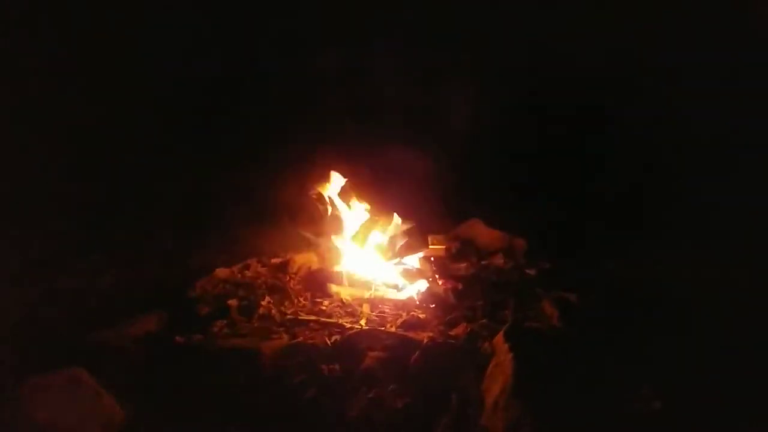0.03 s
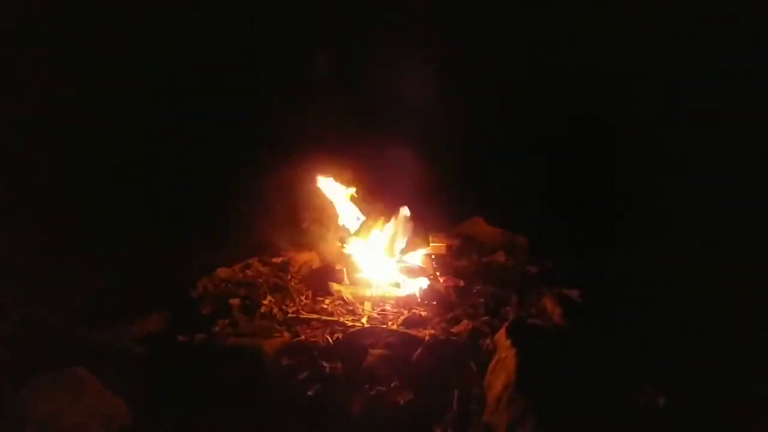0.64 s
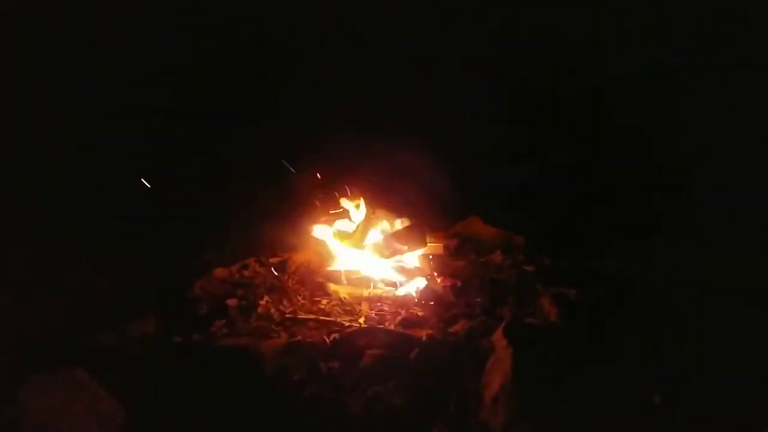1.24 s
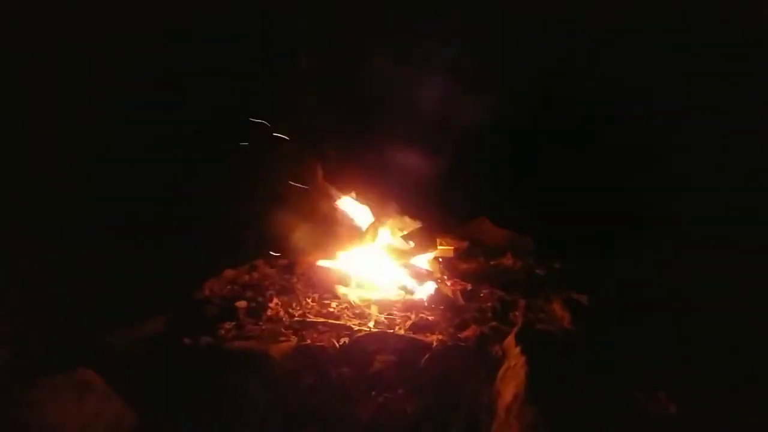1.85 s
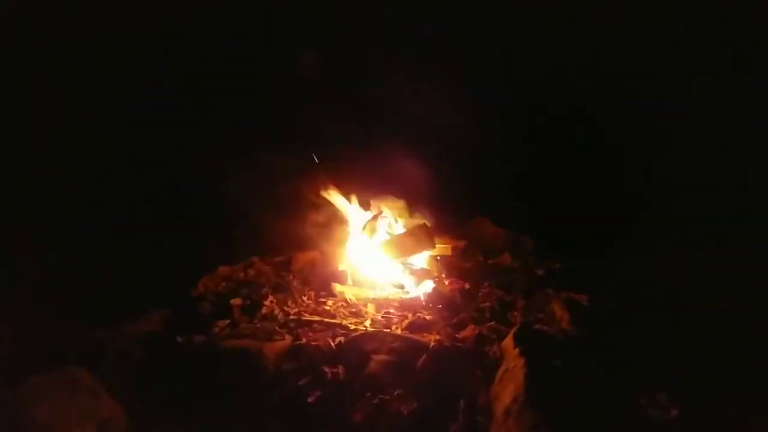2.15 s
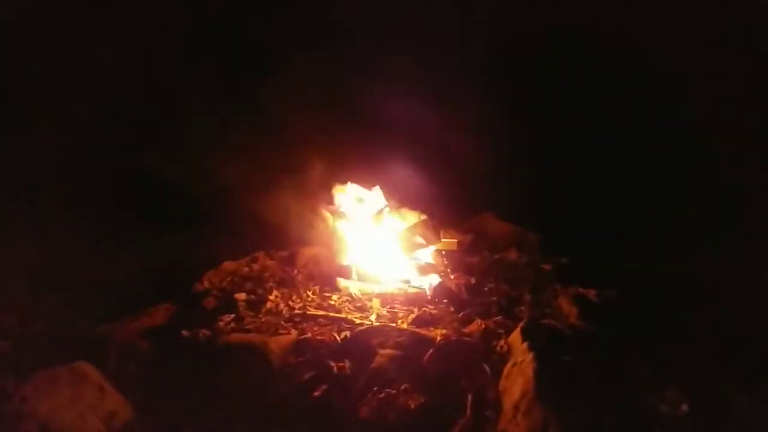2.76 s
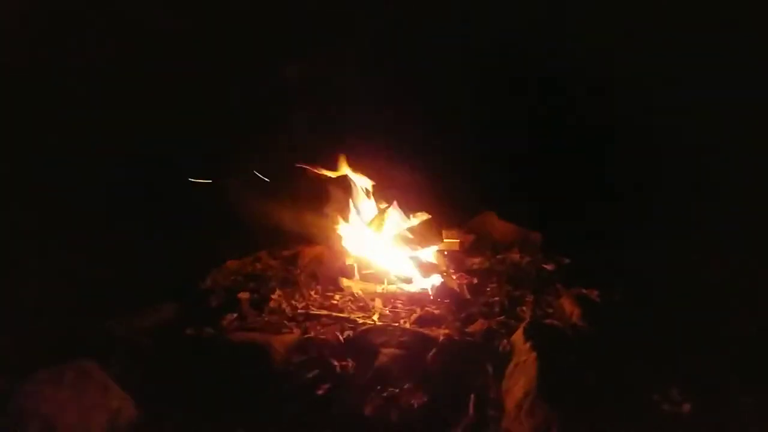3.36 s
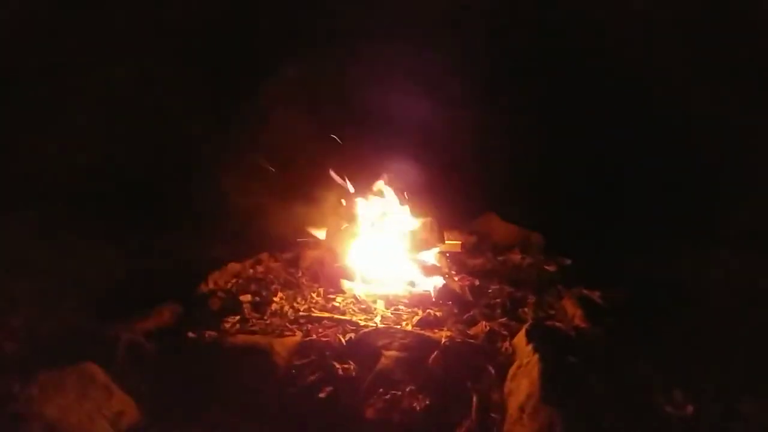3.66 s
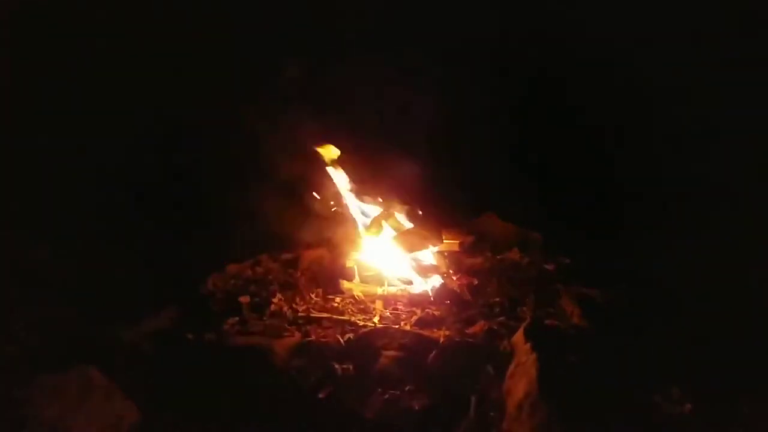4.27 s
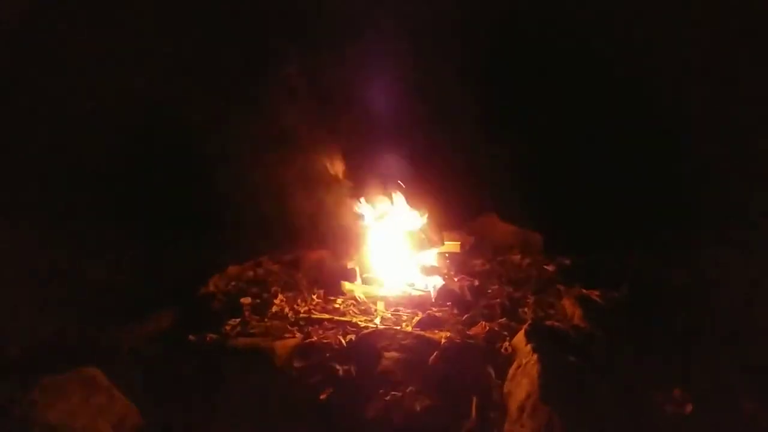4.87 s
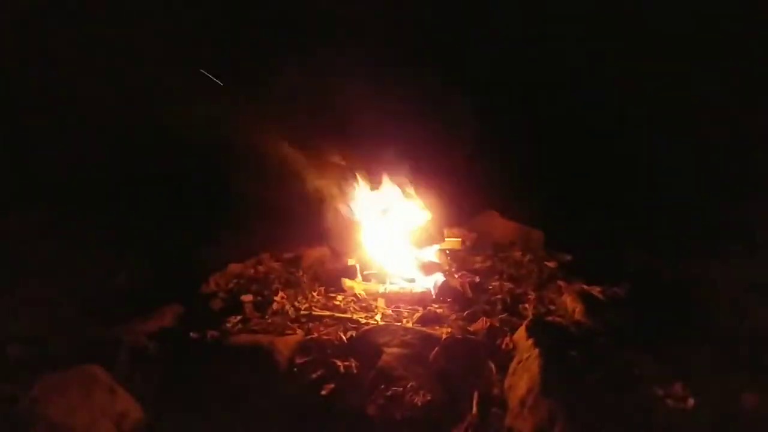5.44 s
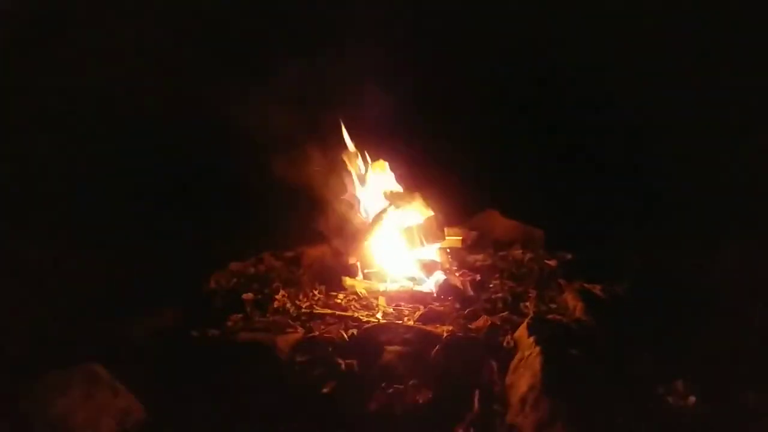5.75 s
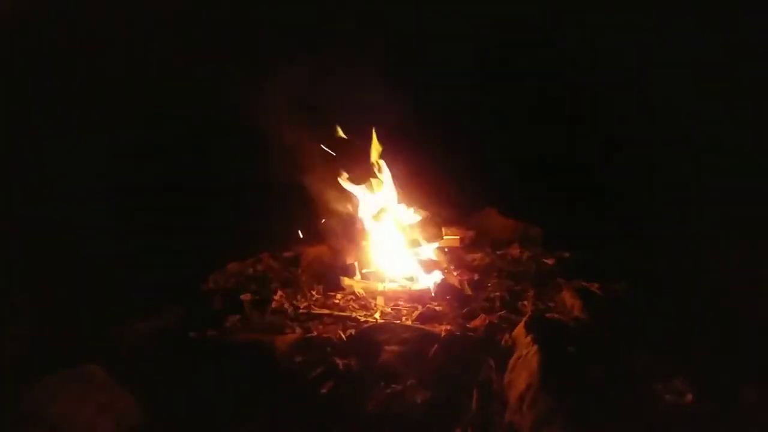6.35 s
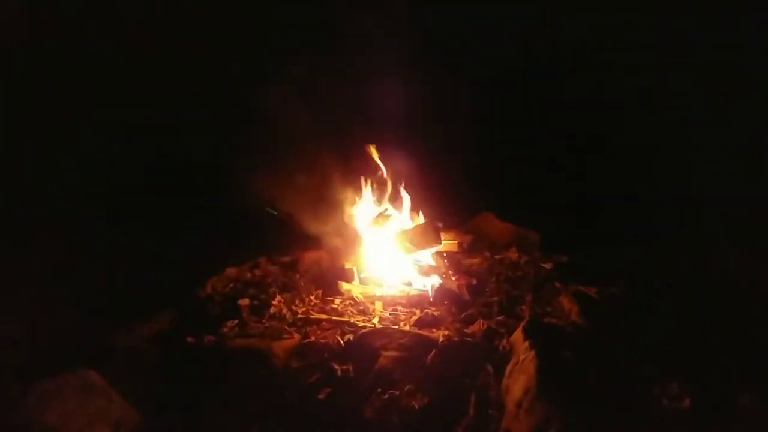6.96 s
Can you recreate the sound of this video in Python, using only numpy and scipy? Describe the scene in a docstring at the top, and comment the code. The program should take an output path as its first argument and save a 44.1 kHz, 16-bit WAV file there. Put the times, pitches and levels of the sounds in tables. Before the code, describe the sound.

A small wood fire burns on the ground outdoors at night, a few metres from a stereo microphone and slightly to the left. Throughout, flames flutter with a soft low rumble over a faint hiss, and embers give tiny, bright ticks. A few light pops with low thumps come around 1 second. Near 1.7 seconds two very loud, sharp cracks burst from the wood a tenth of a second apart, followed by a short, gritty spit of steam. Smaller pops land at about 2.2 and 3.7 seconds. From 4 to 4.7 seconds soft jets of steam escape, with a very faint, wavering whistle that also shows at the start and near the end. A loud, dry pop comes at 5 seconds, and lighter ones at 6.1 and 6.5. The pops echo briefly off the ground and trees, and the fire keeps burning to the end, around 7 seconds.

```python
"""A small wood fire burns on the ground at night, a few metres from a stereo microphone.
From the start, flames flutter with a low rumble over a faint hiss, embers tick and steam sings softly.
Near 1.7 s two steam pockets burst in the wood, very loud, and steam spits out after them.
Smaller pops follow, with soft jets of steam from 4 s and a loud, dry pop near 5 s; the fire burns on.
Every pop scatters off the ground and comes back from the trees."""
import sys
import numpy as np
from scipy import signal
from scipy.fft import rfft, irfft, next_fast_len
from scipy.io import wavfile
from scipy.ndimage import uniform_filter1d

SR = 44100
rng = np.random.default_rng(int(sys.argv[2]) if len(sys.argv) > 2 else 0)


def transcribe(signal):
    """Save signal, clipped to [-1, 1], as a 16-bit WAV file at the path in sys.argv[1]."""
    frames = np.atleast_2d(signal).T
    limited = np.clip(frames, -1, 1)
    pcm = np.round(limited * 32767).astype(np.int16)
    wavfile.write(sys.argv[1], SR, pcm)


N = 313551
T = np.arange(N) / SR
RIGHT_LAG = int(0.00022 * SR)  # samples; the right microphone lies further from the fire


def undb(db):
    """Decibels to gain."""
    return 10 ** (np.asarray(db) / 20)


def unit(x):
    """Scale to a mean energy of one per channel."""
    return x / np.sqrt(np.mean(np.sum(x ** 2, axis=-1)))


def level(x, db):
    """Scale to an rms level."""
    return x * undb(db) / np.sqrt(np.mean(x ** 2))


def pan(db):
    """Constant-power gains for a balance of left minus right."""
    gains = undb([[db / 2], [-db / 2]])
    return gains / np.sqrt(np.mean(gains ** 2))


def curve_db(points, size):
    """An EQ curve read at the bins of a transform."""
    hz, db = np.transpose(points)
    return np.interp(np.log(np.arange(size // 2 + 1) * SR / size + 1), np.log(hz), db)


def colour(x, points):
    """Shape a noise with an EQ curve."""
    size = x.shape[-1]
    return irfft(rfft(x) * undb(curve_db(points, size)), size)


def bump(hz, width_hz, size):
    """A resonance of height one at the bins of a transform."""
    return 1 / (1 + (2 * (np.arange(size // 2 + 1) * SR / size - hz) / width_hz) ** 2)


def response(db):
    """A minimum-phase hit of unit energy with this spectrum."""
    cepstrum = irfft(np.log(undb(db)))
    cepstrum[1:] *= 2
    cepstrum[len(cepstrum) // 2:] = 0
    return unit(irfft(np.exp(rfft(cepstrum))))


def add(out, s, sound):
    """Mix a sound in at a time."""
    i = int(np.clip(s * SR, 0, N - 1))
    out[:, i:i + sound.shape[-1]] += sound[..., :N - i]


def walk(rate):
    """Random modulation of unit spread: values held 1 / rate s and slewed twice."""
    hold = int(SR / rate)
    steps = np.repeat(rng.standard_normal(N // hold + 1), hold)
    smooth = uniform_filter1d(uniform_filter1d(steps, hold), hold)[:N]
    return smooth / smooth.std()


def swell(middle_s, half_s):
    """A smooth rise and fall around a moment."""
    return np.exp(-((T - middle_s) / half_s) ** 2)


def envelope(t, start_s, rise_s, end_s, db_per_s):
    """Rise from the start, hold until the end, then die away."""
    return np.clip((t - start_s) / rise_s, 0, 1) * undb(-db_per_s * np.maximum(t - end_s, 0))


def faint_hiss(level_db=-67, pan_db=3.0, band_hz=2200, band_width_hz=1500, band_shift_db=-4):
    """A steady faint hiss, leaning left except for one band near the middle."""
    # tone of the faint hiss as the microphone colours it (frequency [Hz], gain [dB])
    hiss_eq = [(700, -18), (1200, -4), (1750, -3), (2150, -0.5), (2600, -3), (3600, -5), (4300, -4),
               (5500, -7.5), (7660, -6), (9300, -16), (10700, -19), (12500, -13), (14700, -10.5),
               (16000, -12.5)]
    hiss = rfft(colour(rng.standard_normal((2, N)), hiss_eq))
    lean_db = pan_db + band_shift_db * bump(band_hz, band_width_hz, N)
    return level(irfft(hiss * undb([lean_db / 2, -lean_db / 2]), N), level_db)


def singing(pitch_hz=2120, waver_hz=40, half_width_hz=230, flutter_db=2.0, pan_db=-2):
    """A narrow jet of steam sings faintly in one crack, unsteady in pitch."""
    # swells of the jet (centre time [s], half length [s], level [dB])
    spells = [(0.17, 0.24, -71), (4.156, 0.3, -67.5), (5.155, 0.51, -75), (6.52, 0.24, -69)]
    flow = sum(undb(db) * swell(s, half_s) for s, half_s, db in spells)
    narrow = signal.butter(2, half_width_hz, fs=SR, output="sos")
    eddies = signal.sosfilt(narrow, rng.standard_normal((2, N)) + 1j * rng.standard_normal((2, N)))
    cycles = np.cumsum(pitch_hz + waver_hz * walk(12)) / SR
    tone = np.real(eddies * np.exp(2j * np.pi * cycles))
    return level(tone, 0) * flow * undb(flutter_db * walk(17)) * pan(pan_db)


def steam(relative_width=1.3, flutter_db=1.2):
    """Steam escapes through narrow cracks in short soft jets."""
    # jets of steam (centre time [s], half length [s], level [dB], band centre [Hz])
    jets = [(0.116, 0.045, -61, 3080), (0.167, 0.043, -62.5, 2430), (1.64, 0.15, -65.5, 2500),
            (3.985, 0.086, -61.5, 2830), (4.19, 0.074, -60.5, 2840), (4.397, 0.065, -63.5, 2650),
            (4.64, 0.052, -64, 2630), (6.42, 0.12, -69, 4220)]
    out, size = np.zeros((2, N)), next_fast_len(N)
    for s, half_s, db, hz in jets:
        band = bump(hz, relative_width * hz, size) ** 2
        jet = irfft(rfft(rng.standard_normal((2, size))) * band, size)[:, :N]
        out += level(jet, db) * swell(s, half_s)
    return out * undb(flutter_db * walk(40))


def spits(rise_s=0.0057, grain_db=6.5, sputter_db=0.26, pan_db=3):
    """Steam under pressure spits from an opened pocket: a bright gritty jet that holds and runs out."""
    # spurts of steam (time [s], length [s], level [dB], decay [dB/s])
    spurts = [(1.675, 0.027, -52, 140), (1.76, 0.057, -43, 144), (2.25, 0.075, -57, 239.5),
              (3.099, 0.028, -54, 380)]
    # tone of a spit (frequency [Hz], gain [dB])
    spit_eq = [(800, -19), (1900, -15), (2500, -10.5), (3200, -5.5), (5000, -7), (6300, -6.5), (7500, 1.5),
               (8700, -4.5), (9700, -17), (10700, -31.5), (11700, -14), (15500, -11)]
    flow = sum(undb(db) * envelope(T, s, rise_s, s + length_s, fall) for s, length_s, db, fall in spurts)
    jet = colour(rng.standard_normal((2, N)) * undb(grain_db * rng.standard_normal(N)), spit_eq)
    return level(jet, 0) * flow * undb(sputter_db * walk(90)) * pan(pan_db)


def flames(flicker_db=2, puff_db=1.0, puffs_per_s=18, rush_hz=400, rest_db=-55, wide_hz=600, pan_db=4.5):
    """Unsteady burning puffs and rumbles under a steadier rush; single tongues of flame flap."""
    # tone of the burning (frequency [Hz], gain [dB])
    rumble_eq = [(20, -50.5), (31, -31), (42, -21.5), (56, -3), (80, 3), (125, -1), (200, -5.5),
                 (285, -15.5), (360, -13.5), (500, -20.5), (800, -23), (1200, -30.5), (1700, -39),
                 (3300, -68.5)]
    # how strongly the fire draws (time [s], rumble level [dB])
    draw = [(0, -57), (0.15, -51.5), (0.42, -54), (1.0, -52), (1.25, -57), (2.3, -53.5), (2.5, -59.5),
            (2.65, -56), (3.35, -53.5), (3.52, -58), (3.95, -49.5), (4.27, -57), (4.47, -53.5),
            (4.68, -58.5), (5.15, -52.5), (5.7, -53), (6.5, -53.5), (7.1, -56.5)]
    # tone of one flap (frequency [Hz], gain [dB])
    flap_eq = [(25, -41), (60, -1), (110, 1.5), (190, -2), (300, -17.5), (600, -27), (1500, -64)]
    # tongues of flame; the row at 0.886 s is the deep boom under the pop just before it (time [s], relative
    # energy [dB])
    flaps = [(0.166, -25), (0.247, -25), (0.708, -40), (0.886, -17), (1.348, -20), (3.309, -25),
             (3.431, -21), (3.605, -25), (3.864, -21), (3.976, -24), (4.944, -19.5), (5.253, -17),
             (5.473, -21.5), (5.688, -16), (5.893, -19), (6.325, -20.5), (6.464, -20.5), (6.67, -20),
             (6.742, -21)]
    common, own = rng.standard_normal(N), rng.standard_normal((2, N))
    hz = np.arange(N // 2 + 1) * SR / N
    width = hz ** 2 / (hz ** 2 + wide_hz ** 2)  # mono lows, wide highs
    noise = irfft(rfft(common) * np.sqrt(1 - width) + rfft(own) * np.sqrt(width), N)
    roar = level(colour(noise * undb(flicker_db * walk(45)), rumble_eq), db=-0.04)
    bass = irfft(rfft(roar) * np.exp(-(hz / rush_hz) ** 2), N)
    draw_db = np.interp(T, *np.transpose(draw))
    rumble = bass * undb(draw_db + puff_db * walk(puffs_per_s))
    rush = (roar - bass) * undb((draw_db + rest_db) / 2)  # follows the draw half as far
    out = rumble + rush
    flap = response(curve_db(flap_eq, size=4096))
    for s, db in flaps:
        add(out, s, undb(db - 1) * flap)
    return out * pan(pan_db)


def crack(ring_hz, ring_db, top_db, scatter_db, ring_width_hz=1000, grain_db=3):
    """Fibres snap and a splinter rings for a millisecond; logs and ground scatter the click."""
    # tone of the crack as the microphone colours it (frequency [Hz], gain [dB])
    crack_eq = [(40, -52), (300, -21), (1500, -16), (2200, -10.5), (3000, -7.5), (5000, -8.5), (7500, 1.5),
                (8700, -3.5), (10000, -15.5), (10800, -19), (12500, -10), (15500, -11)]
    # thin fibres part faster, which lifts the top treble
    sharpness = curve_db([(8000, 0.0012), (12000, top_db)], size=512)
    ring = ring_db * bump(ring_hz, ring_width_hz, size=512)
    snap = response(curve_db(crack_eq, size=512) + sharpness + ring)
    t = np.arange(4096) / SR
    early = np.exp(-t / 0.0059)
    bounce = 0.18 * np.exp(-((t - 0.0023) / 0.00077) ** 2)
    tail = 0.35 * np.exp(-t / .009)
    attack = 1 - np.exp(-t / .0005)
    grains = rng.standard_normal((2, len(t))) * undb(grain_db * rng.standard_normal(len(t)))
    paths = undb(scatter_db) * unit(grains * (early + bounce + tail) * attack)
    paths[0, 0] += 1  # the direct sound, left first
    paths[1, RIGHT_LAG] += 1
    return signal.fftconvolve(paths, snap[None], axes=1)


def tick(top_db, pan_db=7):
    """One tiny crack from the glowing bed."""
    return pan(pan_db) * crack(ring_hz=7400, ring_db=3, top_db=top_db, scatter_db=-4)


def embers(count=90, faintest_db=-53, range_db=9, dullest_db=-6, top_range_db=20):
    """The glowing bed ticks: clearly at set times, faintly at random in between."""
    # the clearest ticks (time [s], direct energy [dB], top treble [dB])
    clear_ticks = [(0.288, -40, -4), (0.5085, -35, -2), (0.73, -43, 12), (0.9664, -44, 22),
                   (1.111, -36, -10), (1.15, -41, -2), (1.338, -42, -16), (1.6944, -37, -17),
                   (2.0642, -30, -2), (2.3747, -36, 7), (2.4876, -34, -11), (2.9337, -37, 6),
                   (3.4508, -38, -19), (3.4645, -36, -3.5), (4.0938, -36.5, -6), (4.196, -39, 7),
                   (4.2276, -40.5, 6), (4.4178, -36.5, 4), (5.2536, -35.5, 5), (5.4103, -38, 4),
                   (5.4336, -39, 16), (5.5625, -37, 5), (5.626, -38, 4), (5.8168, -39, -5),
                   (6.2817, -33.5, -1), (6.2952, -38, -10), (6.6517, -40, 2), (6.912, -34.5, 13),
                   (6.9417, -37, 16), (7.007, -40, 8)]
    out = np.zeros((2, N))
    for s, db, top_db in clear_ticks:
        add(out, s, undb(db) * tick(top_db))
    for when, size, sharpness in rng.random((count, 3)):
        gain = undb(faintest_db + range_db * size ** 2)
        add(out, when * N / SR, gain * tick(dullest_db + top_range_db * sharpness))
    return out


def scattered(sound, spread_db, spread_s):
    """A sound followed by its faint returns from the ground and the stones around the fire."""
    t = T[:sound.shape[-1]]
    paths = unit(rng.standard_normal((2, len(t))) * np.exp(-t / spread_s))
    return sound + undb(spread_db) * signal.fftconvolve(sound, paths, axes=1)[:, :len(t)]


def trees(send, far_db=-20, grain_db=5.0, dull_s=.25, pan_db=-1.0):
    """The undergrowth answers a pop at once, the far edge of the wood late; long paths return duller."""
    # tone of the echo (frequency [Hz], gain [dB])
    echo_eq = [(200, -16), (1000, -11), (1900, -10.5), (2800, -10), (5200, -8), (7700, 1.5), (8800, -3.5),
               (10000, -23.5), (10800, -29), (12500, -16), (15500, -12.5)]
    t = T[:SR]
    undergrowth = envelope(t, start_s=0.0027, rise_s=0.0077, end_s=0.0104, db_per_s=230.5)
    far_edge = undb(far_db) * envelope(t, start_s=0.17, rise_s=0.052, end_s=0.58, db_per_s=149)
    grains = rng.standard_normal((2, SR)) * undb(grain_db * rng.standard_normal((2, SR)))
    bright = colour(grains, echo_eq)
    dull = colour(bright, [(1750, 6), (3500, 0), (10500, -3)])
    distance = np.clip(t / dull_s, 0, 1)
    returns = (1 - distance) * unit(bright) + distance * unit(dull)
    echo = unit(returns * (undergrowth + far_edge))
    return pan(pan_db) * signal.fftconvolve(send, echo, axes=1)[:, :N]


def pops(low_pan_db=5, thump_lag_s=.0015):
    """Steam pockets burst: each a crack and a knock of the log, with a low booming thump under it."""
    # bursts (time [s], direct crack energy [dB], ring [Hz], ring boost [dB], top treble [dB],
    # depth in the pile [0-1], knock over crack [dB], thump over crack [dB], left minus right [dB])
    bursts = [(0.106, -28.5, 7900, 4, -2, 0.2, -27, -19, 10), (0.187, -36, 4800, 12, 8, 0.52, -10, -14, 5),
              (0.8822, -28.5, 7560, 6.8, 10, 0.28, -13, 15.5, 11),
              (1.0522, -24, 3630, 4.5, -10, 0.83, -1, 7, 5), (1.0714, -28.5, 7500, 3.5, -12, .3, -13, 7, 4),
              (1.0917, -30.5, 7600, 5, -10, 0.18, -22, -10, 8),
              (1.6541, 3, 5550, 13.5, 2, 0.2, -2, -9.5, 6),
              (1.7540, 7.5, 7070, 8.5, -0.5, 0.25, -24, -7.5, 1.5),
              (2.2252, -21, 7700, 9.8, -13, 0.2, -13, -32, -12),
              (3.724, -17, 7320, 16, 12, 0.028, -30.5, -26, 7),
              (4.003, -30.5, 3690, 20, -32, .4, -5.5, 8, 5),
              (4.4661, -34, 6470, 5.7, -3, 0.23, -25, -11, 13.5),
              (4.701, -31, 8500, 3, 11.5, 0.36, -22, -24, 7.5),
              (4.946, -46.5, 5000, 3, -10, 0.32, 11, 18, 5), (4.9645, -30, 7500, 9, 4, 0.45, -30, -23, 3.5),
              (4.9847, -8, 7330, 10.3, -2.5, 0.082, -20, -20.5, 11),
              (5.779, -32, 8700, 10, 13, 0.72, -26.5, -19.5, 5),
              (6.1037, -25.5, 6100, 4.7, 2.5, 0.79, -15, -6, 4),
              (6.502, -18.5, 8330, 14.5, 3.5, 0.73, -13.5, -8, 4),
              (6.5163, -27.5, 8000, 7.4, -4, 0.35, -14, -23, -6)]
    # body of the log (frequency [Hz], gain [dB])
    knock_eq = [(30, -33), (120, -15.5), (230, -7), (295, -14.5), (350, -4.5), (440, -6.5), (550, 1),
                (740, -5.5), (890, 0.5), (1150, -4.5), (1500, -18.5), (3000, -46)]
    # tone of the low thump, the microphone's bass response ringing (frequency [Hz], gain [dB])
    thump_eq = [(25, -40), (50, -18.5), (85, -5.5), (120, 6), (155, 0), (195, 3), (255, -5.5), (305, -32),
                (360, -15.5), (500, -34.5), (1500, -61.5)]
    out, send = np.zeros((2, N)), np.zeros((2, N))
    knock, thump = (response(curve_db(eq, size=4096)) for eq in (knock_eq, thump_eq))
    knock = scattered(np.stack([knock, np.roll(knock, RIGHT_LAG)]), spread_db=-17.5, spread_s=0.0257)
    thump = scattered(thump[None], spread_db=-20, spread_s=0.038)
    for s, db, ring_hz, ring_db, top_db, depth, knock_db, thump_db, pan_db in bursts:
        # deeper in the pile means more scatter and more echo
        scatter_db = np.interp(depth, (0, 1), (-5.5, 7.7))
        echo_db = np.interp(depth, (0, 1), (-18.5, -0.5))
        add(out, s, undb(db) * pan(pan_db) * crack(ring_hz, ring_db, top_db, scatter_db))
        add(out, s, undb(db + knock_db) * pan(low_pan_db) * knock)
        add(out, s + thump_lag_s, undb(db + thump_db) * pan(low_pan_db) * thump)
        add(send, s, undb([db + echo_db]))  # one impulse excites the echo
    return out + trees(send)


def scene():
    """The fire and the night around it."""
    return pops() + embers() + flames() + spits() + steam() + singing() + faint_hiss()


def record(dry):
    """Clip at full scale, then cut the top steeply at 16 kHz."""
    high_cut = signal.ellip(10, .2, 70, 16000, fs=SR, output="sos")
    return signal.sosfilt(high_cut, np.clip(dry, -1, 1))


dry = scene()
out = record(dry)
transcribe(out)
```